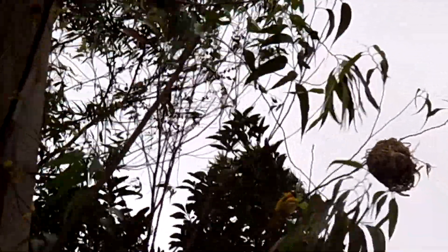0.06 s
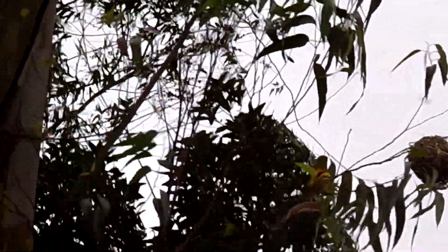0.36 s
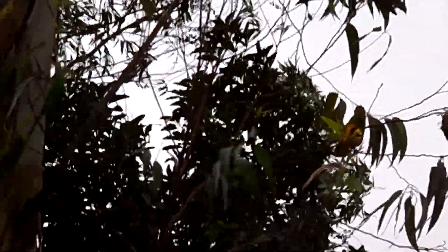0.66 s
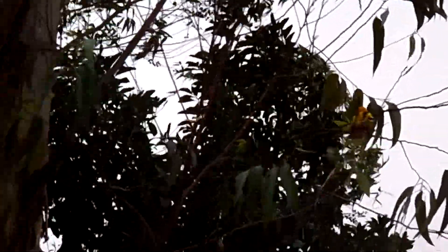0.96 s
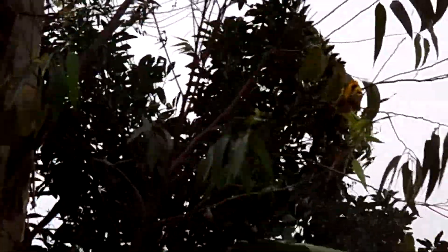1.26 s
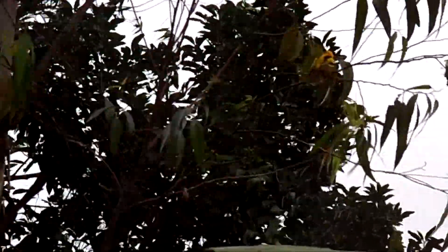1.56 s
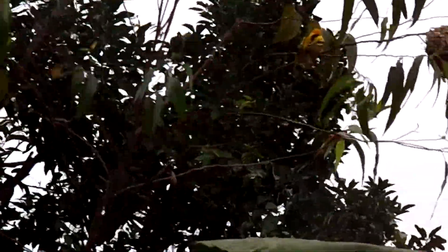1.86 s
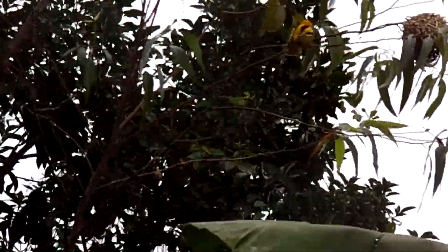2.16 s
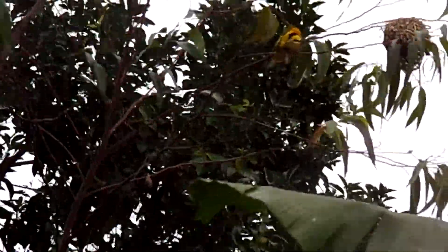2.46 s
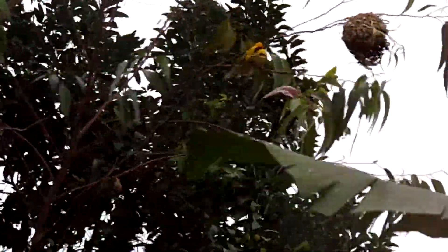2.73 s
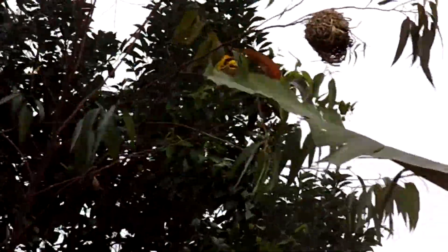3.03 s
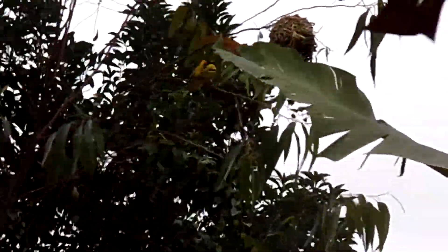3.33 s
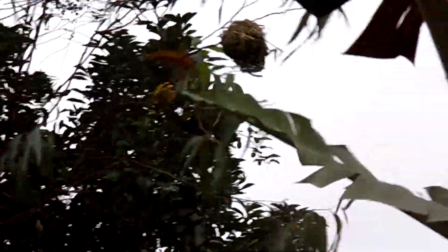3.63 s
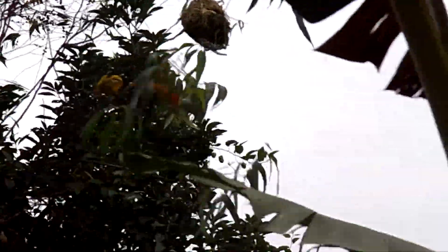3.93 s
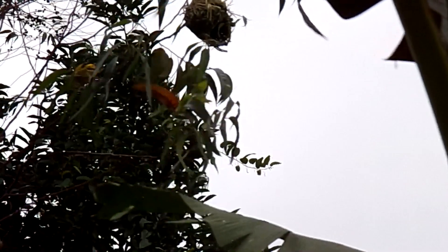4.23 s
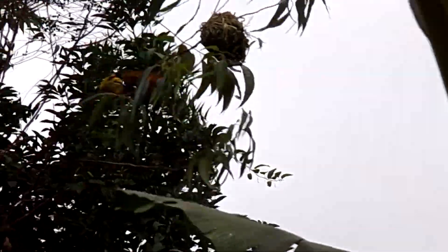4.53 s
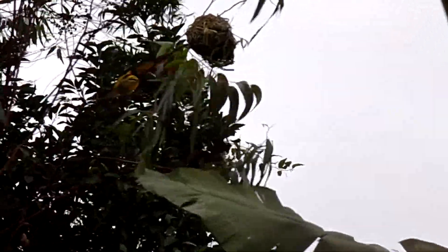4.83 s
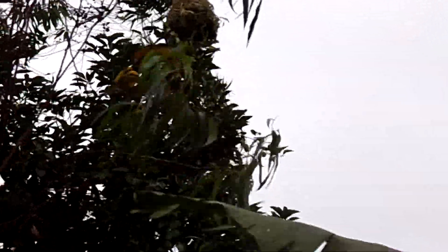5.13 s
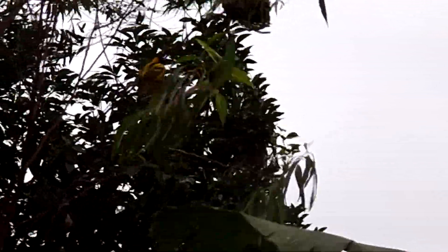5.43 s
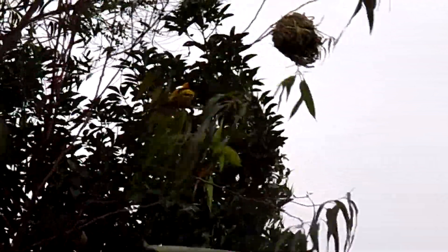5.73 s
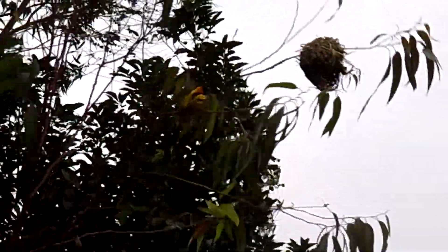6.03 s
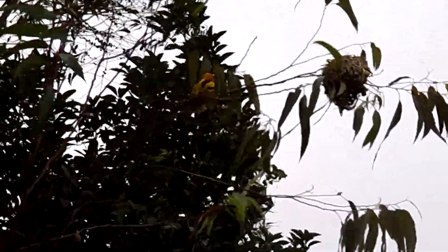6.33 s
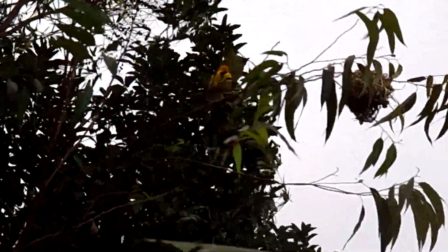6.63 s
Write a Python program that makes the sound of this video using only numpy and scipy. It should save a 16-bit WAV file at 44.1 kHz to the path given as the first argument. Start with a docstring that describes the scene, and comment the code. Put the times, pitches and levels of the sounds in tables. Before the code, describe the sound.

Faint, short bird chirps and three nasal whining calls over a steady hiss, with gusts of wind buffeting the microphone.

```python
"""Over a steady hiss, weaver birds chirp faintly in the trees around their nest: short, gliding whistles.
From 1.4 to 2.9 s gusts buffet the single microphone of a hand-held camera, their eddies hitting in puffs.
From 2.4 to 3.6 s one bird gives three nasal whines, a buzz shaped by its throat. From 5.4 s another
hoots far off, and the gusts return. Throughout, the foliage echoes the birds, the housing colours
everything, and the camera's fixed filters cut four narrow notches into the treble."""
import sys
import numpy as np
from scipy import signal
from scipy.fft import rfft, irfft, next_fast_len
from scipy.io import wavfile
from scipy.ndimage import uniform_filter1d, map_coordinates

SR = 44100
rng = np.random.default_rng(int(sys.argv[2]) if len(sys.argv) > 2 else 0)


def wav_out(sig):
    """Save sig, one row per channel (or a flat mono array), as 16-bit PCM at SR to the path in sys.argv[1]."""
    wavfile.write(sys.argv[1], SR, np.round(np.clip(np.atleast_2d(sig).T, -1, 1) * 32767).astype(np.int16))


N = 299439


def amp(db):
    """Decibels to gain."""
    return 10 ** (np.asarray(db) / 20)


def along(points, hz):
    """(frequency, value) points read on a log axis."""
    freqs, values = np.transpose(points)
    return np.interp(np.log(hz + 1), np.log(freqs + 1), values)


def wobble(rate_hz):
    """Smooth random curve, rate_hz knots a second."""
    knots = rng.standard_normal(int(N * rate_hz / SR) + 4)
    return map_coordinates(knots, [np.arange(N) * rate_hz / SR])


def filtered(x, response):
    """x through a frequency response."""
    size = next_fast_len(N + SR // 2)
    return irfft(rfft(x, size) * response(np.fft.rfftfreq(size, 1 / SR)), size)[:N]


def noise(spectrum):
    """Coloured noise, rms 1."""
    x = filtered(rng.standard_normal(N), lambda hz: amp(along(spectrum, hz)))
    return x / np.sqrt(np.mean(x ** 2) + 1e-20)


def swells(rows):
    """Summed power of bell-shaped swells; width at half power."""
    t = np.arange(N) / SR
    return sum(amp(db) ** 2 * np.exp2(-np.minimum((2 * (t - centre_s) / width_s) ** 2, 40))
               for centre_s, width_s, db in rows)


# hiss spectrum: (frequency [Hz], relative density [dB])
HISS_SPECTRUM = [(20, -14), (60, 0), (170, 0.5), (480, -4.5), (1000, -4.5), (1700, -3), (2400, -3.5),
                 (3300, 1.5), (5000, -4), (7000, -7.5), (7700, -12), (8900, -6.5), (10200, -20.5),
                 (15500, -23.5)]
def hiss(level_db=-46.0, drift_db=0.1):
    """Steady broadband hiss."""
    return amp(level_db + drift_db * wobble(3.27)) * noise(HISS_SPECTRUM)


# rustle spectrum: (frequency [Hz], relative density [dB])
RUSTLE_SPECTRUM = [(200, -27), (700, 1.5), (2500, 3.5), (6000, 0), (10000, -15), (15000, -27)]
# rustles: (time [s], width [s], peak [dB])
RUSTLE_SWELLS = [(.94, 0.011, -60), (.995, .018, -57), (1.62, 0.042, -51.5), (3.61, 0.027, -49),
                 (5.43, 0.13, -48.5), (6.75, 0.013, -47)]
def rustles():
    """Soft, dry swells of noise."""
    return np.sqrt(swells(RUSTLE_SWELLS)) * noise(RUSTLE_SPECTRUM)


# spells of wind: (start [s], hold [s], relative level [dB], brightness [dB])
GUST_SPELLS = [(1.416, 0.33, -48, -1.5), (1.765, .14, -37.5, 3.5), (2.217, 0.27, -35.5, -0.5),
               (2.515, 0.32, -34.5, -0.5), (3.797, 0.37, -59, -3), (5.7, 0.35, -35, -1),
               (6.186, 0.23, -31.5, 3), (6.46, .3, -31, -1.5)]
def gusts(rise_db_per_s=296, fall_db_per_s=328, calm_db=-71):
    """Power and brightness of the flow: each gust rises, holds and dies away."""
    t = np.arange(N) / SR
    total, weighted_bright = amp(calm_db) ** 2, 0
    for start_s, hold_s, db, bright_db in GUST_SPELLS:
        rise_db = rise_db_per_s * np.maximum(start_s - t, 0)
        fall_db = fall_db_per_s * np.maximum(t - start_s - hold_s, 0)
        power = amp(db - rise_db - fall_db) ** 2
        total += power
        weighted_bright += power * bright_db
    return total, weighted_bright / total


# turbulence spectrum: (frequency [Hz], relative density [dB])
EDDY_SPECTRUM = [(20, -33), (45, 0), (85, 7.5), (135, 8.5), (220, 2.5), (320, -6.5), (480, -16), (750, -29),
                 (1000, -37), (1400, -49.5), (2200, -65), (5000, -92)]
# eddies hitting the microphone: (time [s], width [s], relative peak [dB])
EDDY_PUFFS = [(.25, 0.02, -47), (.534, 0.028, -41.5), (.861, 0.034, -47.5), (1.2, 0.025, -39.5),
              (1.325, .036, -41), (1.452, 0.017, -22.5), (1.573, 0.02, -23), (1.66, 0.015, -30),
              (1.79, 0.031, -27), (1.838, 0.018, -24.5), (1.942, 0.0075, -30.5), (2.277, 0.032, -19.5),
              (2.337, 0.019, -18), (2.359, 0.016, -14.5), (2.386, 0.019, -17), (2.529, 0.02, -24.5),
              (2.577, 0.026, -19), (2.634, 0.026, -17), (2.667, 0.02, -18), (2.697, 0.012, -15.5),
              (2.92, 0.027, -27.5), (3.886, 0.044, -41.5), (4.043, 0.026, -35.5), (4.422, 0.028, -43),
              (5.744, 0.018, -24), (5.876, 0.021, -19.5), (6.025, 0.019, -27.5), (6.135, 0.028, -28.5),
              (6.223, .027, -25), (6.282, 0.025, -23), (6.313, 0.011, -19.5), (6.343, 0.015, -18.5),
              (6.373, 0.013, -19.5), (6.481, 0.0069, -22), (6.524, 0.015, -20), (6.61, .012, -24.5),
              (6.686, 0.011, -22.5), (6.768, 0.0084, -10.5)]
def wind(gust_flutter_db=3.5, puff_flutter_db=0.67, large_hz=340, medium_hz=720, port_hz=85, gain_db=1.4):
    """Turbulence at the microphone port, in three eddy sizes; puffs ride on the gusts."""
    gust_power, gust_bright_db = gusts()
    churn = wobble(45)
    puff_power = swells(EDDY_PUFFS) * amp(puff_flutter_db * churn) ** 2
    level_db = 10 * np.log10(gust_power * amp(gust_flutter_db * churn) ** 2 + puff_power)
    # stronger flow, more small eddies
    bright_db = np.clip(0.87 * (level_db + 26) + gust_bright_db, -42, 9) + 0.85 * wobble(70)
    eddies = noise(EDDY_SPECTRUM)
    # flatten the envelope: the flow sets the strength
    eddies /= np.sqrt(uniform_filter1d(np.abs(signal.hilbert(eddies)) ** 2 / 2, size=500))
    large = filtered(eddies, lambda hz: 1 / (1 + (hz / large_hz) ** 6))
    medium = filtered(eddies, lambda hz: 1 / (1 + (hz / medium_hz) ** 6)) - large
    small = eddies - large - medium
    pressure = amp(level_db + gain_db) * (large + medium * amp(bright_db) + small * amp(1.5 * bright_db))
    # the port passes no deep bass
    return filtered(pressure, lambda hz: hz ** 2 / np.hypot(hz ** 2, port_hz ** 2))


# echo decay among the trees: (frequency [Hz], T60 [s])
FOLIAGE_T60 = [(500, .45), (4000, .4), (10000, .25)]
def foliage(x, delay_s=0.017):
    """Diffuse, delayed echo from leaves and trunks."""
    hz, t, spectra = signal.stft(rng.standard_normal(SR // 2), SR, nperseg=256)
    decay = amp(-60 * t / along(FOLIAGE_T60, hz)[:, None])
    tail = signal.istft(spectra * decay, SR, nperseg=256)[1]
    impulse = np.pad(tail, (int(delay_s * SR), 0)) / np.linalg.norm(tail)
    return signal.fftconvolve(x, impulse)[:N]


# a whistle's octave: (pitch [Hz], level re fundamental [dB])
WHISTLE_OCTAVE = [(800, -15), (1500, -20), (3200, -28), (4100, -16), (4550, -9), (4950, -24)]
def whistles(rows, peak_fraction, rasp_hz=330, flutter_db=1, rasp_db=4):
    """Gliding tones with a weak octave; rasp shakes pitch and level; bend > 0 glides early, < 0 late."""
    out, shake, flutter = np.zeros(N + SR), wobble(700), wobble(160)
    for start_s, length_s, from_hz, to_hz, bend, db, rasp in rows:
        progress = np.linspace(0, 1, int(length_s * SR))
        at = round(start_s * SR) + np.arange(len(progress))
        glide_hz = from_hz + (to_hz - from_hz) * np.expm1(-bend * progress) / np.expm1(-bend)
        phase = 2 * np.pi * np.cumsum(glide_hz + rasp * rasp_hz * shake[at % N]) / SR
        tone = np.sin(phase) + amp(along(WHISTLE_OCTAVE, glide_hz)) * np.sin(2 * phase)
        envelope = np.sqrt(np.sin(np.pi / 2 * np.interp(progress, [0, peak_fraction, 1], [0, 1, 0])))
        gain = amp(db + (flutter_db + rasp_db * rasp) * flutter[at % N])
        out[at] += np.sqrt(2) * gain * envelope * tone
    return out[:N]


# distant hoots: (start [s], length [s], pitch [Hz], relative level [dB])
HOOT_NOTES = [(5.38, 0.041, 1230, -54), (5.57, 0.058, 1560, -51), (5.58, 0.18, 833, -55.5),
              (5.8, .09, 1585, -50.5), (5.965, .067, 1570, -49.5), (6.1, 0.092, 1590, -52),
              (6.32, 0.14, 1435, -55.5)]
def hoots(sag_hz=59.4, bend=1, rasp=0.17, gain_db=-3):
    """A far bird's soft notes, sagging slightly in pitch."""
    rows = [(start_s, length_s, hz, hz - sag_hz, bend, db, rasp)
            for start_s, length_s, hz, db in HOOT_NOTES]
    return amp(gain_db) * whistles(rows, peak_fraction=0.37)


# weaver chirps: (start [s], length [s], from [Hz], to [Hz], bend [-], level [dB], rasp [0-1])
CHIRP_NOTES = [(.02, .075, 4350, 4050, -2, -46, .3), (.853, .036, 5400, 6150, 4, -49, .05),
               (.928, .02, 4400, 5150, -.5, -46, .2), (.952, .02, 3750, 4250, 2.5, -46, .15),
               (.972, .023, 4680, 4450, -.5, -44, .25), (.992, .06, 4500, 3150, 4.2, -41, .08),
               (1.273, .066, 4250, 2880, 2, -41.5, .08), (1.872, .045, 4620, 4350, -2, -47, .1),
               (1.908, .062, 4400, 3900, 2, -44, .55), (1.935, .04, 3120, 3350, -2, -48, .35),
               (2.12, .075, 2480, 2530, 3, -48, .05), (2.638, .06, 5120, 4600, -1.2, -47, .3),
               (4.012, .055, 5300, 4850, 1.2, -49, .4), (4.062, .038, 4500, 3170, 3, -48, .3),
               (4.605, .05, 5600, 3980, 3, -50, .3), (4.66, .035, 3650, 3200, 1, -48, .5),
               (5.484, .058, 4750, 3950, -1.2, -46, .15), (5.62, .06, 4350, 3950, -.5, -51, .25),
               (6.702, .036, 6700, 7900, 2.5, -54, .1)]
def chirps():
    """Weaver birds' short, high, slurred whistles."""
    return whistles(CHIRP_NOTES, peak_fraction=0.6)


# whine overtones without the throat resonance: (frequency [Hz], relative level [dB])
WHINE_SPECTRUM = [(450, -32), (900, -23), (1330, -10), (1780, -13.5), (2250, -6.5), (2700, -10),
                  (3100, -10), (3600, -11), (4500, -6.5), (5200, -23), (6500, -32)]
# nasal calls, two short, one long: (start [s], length [s], pitch at top_s [Hz], relative level [dB])
WHINE_CALLS = [(2.385, .055, 477, -52), (2.745, .14, 428, -51), (3.1, .46, 458, -42.5)]
def whines(top_s=0.11, tires_s=0.32, rise_hz_per_s=95, sag_hz_per_s=130, drop_hz_per_s=140,
           throat_hz=4120, throat_width_hz=220, throat_db=13.0, jitter=0.0011, waver_db=1.6,
           attack_s=0.04, release_s=0.03, fade_db_per_s=3, gain_db=-6.0):
    """Buzzy, nasal calls: the throat picks out whichever harmonic lies in its resonance."""
    out, unsteady = np.zeros(N), 1 + jitter * wobble(120)
    orders = np.arange(1, 14)[:, None]
    knots_s = np.arange(0, 1, 0.04)
    for start_s, length_s, top_hz, db in WHINE_CALLS:
        t = np.arange(int(length_s * SR)) / SR
        at = round(start_s * SR) + np.arange(len(t))
        arch_hz = np.maximum(rise_hz_per_s * (top_s - t), sag_hz_per_s * (t - top_s))
        drop_hz = drop_hz_per_s * np.maximum(t - tires_s, 0)  # breath runs out
        harmonic_hz = orders * (top_hz - arch_hz - drop_hz) * unsteady[at]
        resonance_db = throat_db * np.exp(-0.5 * ((harmonic_hz - throat_hz) / throat_width_hz) ** 2)
        # paths through the leaves interfere: each harmonic wavers on its own
        waver = np.array([np.interp(t, knots_s, rng.standard_normal(len(knots_s))) for _ in orders])
        gains = amp(along(WHINE_SPECTRUM, harmonic_hz) + resonance_db + waver_db * waver)
        buzz = np.sum(gains * np.sin(2 * np.pi * np.cumsum(harmonic_hz, axis=1) / SR), axis=0)
        envelope = np.clip(np.minimum(t / attack_s, (length_s - t) / release_s), 0, 1)
        out[at] += np.sqrt(2) * amp(db + gain_db - fade_db_per_s * t) * envelope * buzz
    return out


def scene(chirp_echo_db=-9, whine_echo_db=-16, hoot_echo_db=-5):
    """Birds, direct and off the foliage, with wind, hiss and rustles; mono."""
    chirp, whine, hoot = chirps(), whines(), hoots()
    echo = foliage(amp(chirp_echo_db) * chirp + amp(whine_echo_db) * whine + amp(hoot_echo_db) * hoot)
    return (chirp + whine + hoot + echo + wind() + hiss() + rustles())[None]


# housing resonances: (centre [Hz], width [Hz], gain [dB])
HOUSING_RESONANCES = [(328, 50, 3), (598.8, 49, 7.5), (775.4, 53, 5), (1050, 107, 2), (1350, 200, 3),
                      (2385, 480, 9.5), (8840, 2900, -4)]
# the camera's motor-noise notch filters: (centre [Hz], width [Hz])
CAMERA_NOTCH_FILTERS = [(3680, 220), (4385, 280), (8030, 480), (11720, 750)]
def record(dry):
    """The camera: housing resonances, fixed notch filters and band limit."""
    def camera(hz, top_hz=15750):
        housing_db = sum(db / (1 + (2 * (hz - centre) / width) ** 2)
                         for centre, width, db in HOUSING_RESONANCES)
        notches = [(centre ** 2 - hz ** 2) / (centre ** 2 - hz ** 2 + 1j * hz * width)
                   for centre, width in CAMERA_NOTCH_FILTERS]
        return amp(housing_db) * np.prod(notches, axis=0) * (hz < top_hz)
    return filtered(dry[0], camera)[None]


dry = scene()
out = record(dry)
wav_out(out)
```